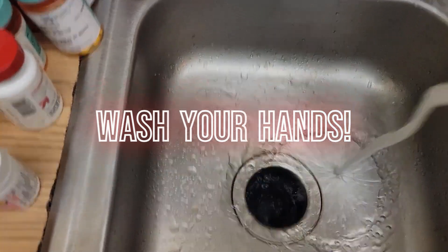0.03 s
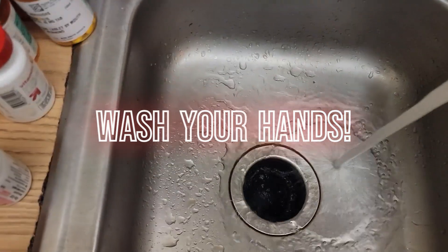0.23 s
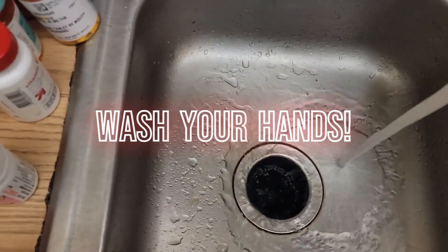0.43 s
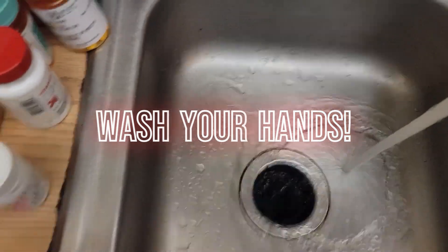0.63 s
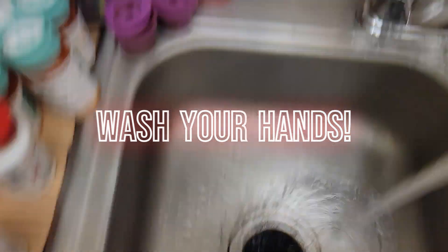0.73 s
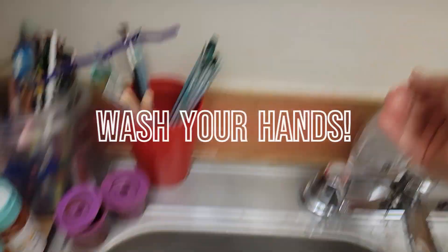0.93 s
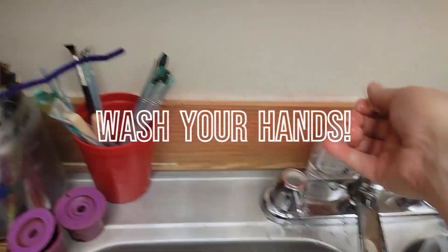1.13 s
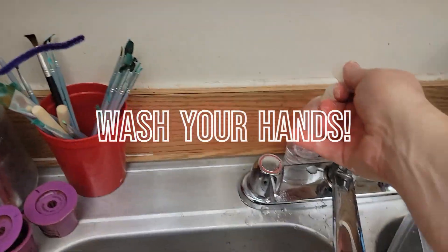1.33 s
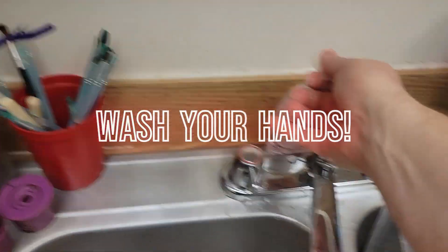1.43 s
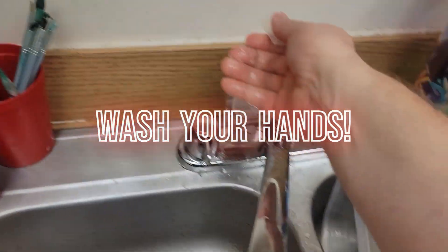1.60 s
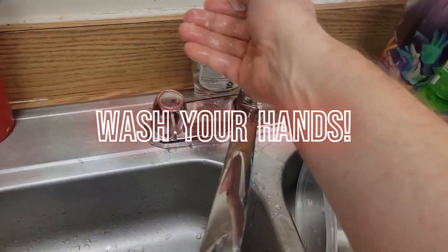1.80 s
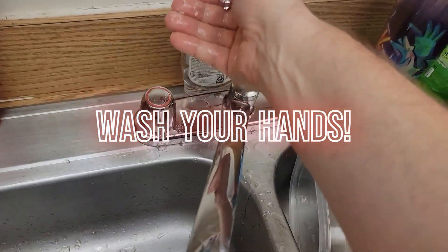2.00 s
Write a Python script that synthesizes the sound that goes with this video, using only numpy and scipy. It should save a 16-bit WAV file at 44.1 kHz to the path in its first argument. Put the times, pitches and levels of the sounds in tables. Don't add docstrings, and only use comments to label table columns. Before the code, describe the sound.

Close stereo sound of running water pounding a metal basin, constant and splashy, its tone shifting as the device moves; handling rustle in the first half second, later light knocks, faint low room hum beneath.

```python
import sys
import numpy as np
from scipy import signal
from scipy.fft import rfft, irfft
from scipy.io import wavfile
from scipy.ndimage import uniform_filter1d

SR = 44100
rng = np.random.default_rng(int(sys.argv[2]) if len(sys.argv) > 2 else 0)


def unload_wav(signal):
    wavfile.write(
        sys.argv[1],
        SR,
        np.round(np.clip(np.atleast_2d(signal).T, -1, 1) * 32767).astype(np.int16),
    )


def rack_gain(trim_db):
    fader = np.asarray(trim_db, float)
    return 10 ** (fader / 20)


N = 90669

# pitch in Hz, level in dB per Hz.
ROOM_HUM = [(25, -79.5), (60, -80), (150, -76), (240, -89.5), (400, -75.5), (600, -89.5), (900, -75.5),
            (1500, -110)]
# pitch in Hz, likeness from 0 to 1.
ROOM_LIKENESS = [(60, 0.91), (270, 1), (450, 0.91), (900, 0.16)]

# time in seconds, level in dB.
HAND_RUB = [
    (0, -39),
    (.04, -41),
    (.11, -41),
    (.135, -50),
    (.205, -54),
    (.215, -33),
    (.3, -36),
    (.35, -42),
    (.43, -48),
    (.47, -67),
]
# pitch in Hz, width in Hz, level in dB.
CASE_RESONANCES = [(36, 100, -9), (86, 113, -5), (163, 70, -4.5), (328, 57, -4.5), (461, 154, -2),
                   (550, 135, -12)]
# start in seconds, peak in dB, pitch in Hz, length in seconds.
CASE_BUMPS = [(0.003, -25, 90, 0.018), (.022, -26, 85, 0.035), (.058, -30, 95, .035), (.095, -34, 80, .045),
              (.14, -36, 105, .035), (.175, -38, 130, .03), (.21, -27, 156, 0.03), (.238, -31, 150, .025),
              (.262, -29.5, 150, 0.035), (.295, -32, 115, .035), (.325, -35, 140, .025),
              (.352, -28.5, 157, 0.03), (.39, -39, 130, .04), (1.141, -44.5, 85, .06),
              (.798, -39.5, 163, 0.042), (1.15, -38, 160, 0.065), (1.322, -39, 150, 0.035),
              (1.342, -31.5, 110, 0.045), (1.36, -38, 180, .03), (1.385, -38, 135, 0.035),
              (1.54, -38.5, 120, 0.03), (1.85, -44, 110, 0.025), (1.94, -45, 150, .025),
              (1.985, -37.5, 125, .05)]
# start in seconds, peak in dB, pitch in Hz, time to fall 60 dB in seconds,
# extra low thud in dB.
CASE_KNOCKS = [
    (.095, -34, 413, 0.068, 2),
    (.211, -21, 346, 0.033, -1),
    (1.137, -26.5, 441, 0.1, -0.5),
    (1.941, -30.5, 507, 0.073, -14),
]
# pitch as a ratio to the knock's pitch, level in dB.
KNOCK_TONES = [(1, 2.5), (1.5, -14), (.82, -1), (.68, -6), (0.49, -8)]
KNOCK_RISE_S, TICK_DB = .002, -16
CASE_SKEW_HZ = 2390

# time in seconds, pose (0 looking down, 1 tilted up, 2 leaning in),
# loudness from nearness to the basin in dB.
CAMERA_PATH = [
    (0, 0.054, -1),
    (.3, 0.012, 0),
    (.42, 0.15, 0.5),
    (.78, 0.16, -0.7),
    (.88, 1.01, -0.3),
    (1.38, 1.48, 0.9),
    (1.52, 1.83, 0.84),
    (2.06, 2.2, -1),
]

# pitch in Hz, level in dB per Hz.
SPLASH_LEFT = [(1180, -77), (1270, -64), (3000, -64.5), (7000, -66.5), (8300, -70.5), (10500, -70.5),
               (12800, -61.5), (15500, -65)]
# pitch in Hz, level in dB per Hz.
SPLASH_RIGHT = [(1180, -74.5), (1270, -63.5), (2600, -72.5), (6500, -63.5), (8300, -66.5), (10300, -65.5),
                (11500, -66.5), (15500, -68)]
# pitch in Hz, change in dB.
SPLASH_CHANGE_LEFT = [(1000, -0.3), (3000, 1), (6000, 5.5), (9000, -1.5), (15000, 3)]
# pitch in Hz, change in dB.
SPLASH_CHANGE_RIGHT = [(1000, -7), (3000, 5.5), (6000, 0), (9000, -5), (15000, -2.5)]
SPRAY_SHARED = .35
SWELL_DB, PATCH_DB, FLICKER_DB = .5, 1.4, .6
TICKS_PER_S, TICK_SPREAD_DB, TICK_SHARE = 4000, 2.5, .3
RIPPLE_DB = 2.2
NOTCH_HZ, NOTCH_WIDTH_HZ, NOTCH_DB = 8250, 150, -2.5

# pitch in Hz, level looking down in dB, level tilted up
# in dB, level leaning in in dB, left over right in dB.
BASIN_MODES = [(592, -54, -56, -54, -2), (900, -53, -51, -52, 1), (975, -50, -53, -51, 2),
               (1025, -52, -54, -54, 1), (1290, -44, -43, -40, 5), (1340, -46, -39, -38, 5),
               (1385, -43, -37, -34, 5), (1430, -42, -38, -37, 4), (1630, -40, -42, -40, 7),
               (1970, -42, -35, -39, 2), (2035, -36, -38, -36, 2), (2110, -34, -38, -35, 7),
               (2478, -42, -45, -43, 9), (2755, -46, -42, -44, 5),
               (3235, -41, -47, -44, 4), (3720, -43, -46, -45, -3), (4048, -36, -34, -37, -4),
              (4630, -43, -41, -43, -5), (4955, -45, -39, -41, -1), (5345, -41, -36, -42, 7),
              (5480, -44, -39, -37, 3), (5580, -47, -36, -38, 2), (6000, -44, -44, -47, 0),
              (6140, -41, -40, -39, 4), (6228, -41, -36, -36, 4), (6625, -50, -45, -38, 3),
               (6985, -46, -36, -36, 2), (7235, -35, -39, -37, 4), (7800, -46, -42, -41, -5),
             (7920, -42, -43, -45, -1), (8520, -46, -45, -47, -1), (9300, -49, -49, -49, -1),
             (10200, -47, -46, -48, -5), (12700, -47, -44, -45, 7)]
# pitch in Hz, then the lead in cycles
RIGHT_LEAD = [(900, 0, -.1, -.22), (1365, .45, .03, -.08), (1630, .03, -.18, -.27), (1970, .4, .2, -.12),
              (2035, .2, .2, -.11), (2110, .33, -.13, -.56), (2600, .35, .4, .78), (4048, -.21, -.47, -.77),
              (4800, -.4, -.35, -.44), (5400, .56, .07, .1), (5580, .12, .47, .11),
              (6228, -.42, -.52, -.02), (6985, -.07, .18, -.32), (7235, .33, .64, .93)]
WIDTH_HZ, LOSS = 50, .006
MODE_SHARED = .92
MODE_DRIFT_DB, DRIFT_HZ = 1.3, 9.0
FILM_HZ, FILM_DB, FILM_END_S = 2050, -6, .36

# middle in seconds, pitch in Hz,
# change in dB, length in seconds.
ECHO_BOOSTS = [(.15, 1250, 4, .35), (.47, 2090, 4, .22), (.82, 2030, 4, .2), (.52, 2000, 2, .3),
               (1.0, 2480, 3, .3), (1.5, 2750, 3, .8), (.35, 3280, 3, .4), (.63, 4050, 8, .1),
               (.6, 4350, 4, .3), (1.05, 4060, 3, .5), (.1, 6200, 5, .1), (.8, 6080, 4, .2),
               (1.52, 6640, 7, .4), (1.1, 6700, 3, .4), (1.58, 7300, 4, .3), (.6, 7500, 4, .15),
               (.79, 7920, 8, .14), (1.0, 8600, 4, .3), (1.8, 8650, 4, .6), (1.45, 1650, 2, .6),
               (.84, 1650, 3, .12), (1.75, 2020, 2, .6)]
# middle in seconds, pitch in Hz, change in dB, length in
# seconds.
PITCH_DIPS = [(.88, 860, -5, .2), (1.2, 1385, -4, .12), (.4, 1650, -3, .3), (1.4, 2280, -6, .4),
              (1.9, 2260, -7, .2), (.75, 2450, -5, .2), (.45, 2900, -7, .7), (1.25, 2920, -5, .5),
              (1.1, 3490, -8, .4), (1.7, 3490, -5, .6), (1.28, 3810, -9, .5), (.15, 4830, -5, .3),
              (1.82, 4780, -6, .4), (1.75, 5130, -5, .3), (1.5, 5340, -5, .5), (1.33, 6200, -5, .08),
              (.45, 6830, -6, .9), (.68, 7200, -5, .15), (.07, 8100, -6, .15), (1.82, 8180, -5, .45),
              (.83, 8400, -5, .1), (.95, 5000, -4, .3), (1.1, 8920, -4, .7), (1.18, 2040, -3, .15),
              (.94, 1360, -3, .12), (.69, 2090, -4, .1)]
ECHO_WIDTH_HZ, ECHO_SPREAD = 45, .007


def evened(x):
    return x / np.sqrt(np.mean(x ** 2) + 1e-20)


def read(points, hz):
    f, value = np.transpose(points)
    return np.interp(np.log(hz + 1), np.log(f + 1), value)


def add(mix, s, sound):
    part = mix[round(s * SR):][:len(sound)]
    part += sound[:len(part)]


def slow(t, top_hz):
    f = np.geomspace(top_hz / 12, top_hz, num=16)[:, None]
    waves = np.sin(2 * np.pi * (f * t + rng.random((16, 1))))
    return evened((waves / np.sqrt(f)).sum(0))


def ring(x, hz, width, order=2):
    pole = np.exp((2j * np.pi * hz - np.pi * width) / SR)
    for _ in range(order):
        x = signal.lfilter([1], [1, -pole], x)
    return x / np.sqrt(np.mean(abs(x) ** 2) / 2)


def colour(x, field_db, size):
    hz, t, z = signal.stft(x, SR, nperseg=size, noverlap=size * 3 // 4)
    z = z * rack_gain(field_db(hz, t)) * np.sqrt(SR / 2)
    return signal.istft(z, SR, nperseg=size, noverlap=size * 3 // 4)[1][:, :N]


def pose(t):
    times, poses, _ = np.transpose(CAMERA_PATH)
    return np.clip(np.interp(t, times, poses), 0, 2)


def room():
    left, other = rng.standard_normal((2, N))
    hz = np.fft.rfftfreq(N, 1 / SR)
    same = np.clip(read(ROOM_LIKENESS, hz), 0, 1)
    right = irfft(same * rfft(left) + np.sqrt(1 - same ** 2) * rfft(other), N)

    def field_db(hz, t):
        return read(ROOM_HUM, hz)[:, None] + 1.5 * slow(t, 12.)
    return colour(np.array([left, right]), field_db, size=2048)


def rub():
    t = np.arange(N) / SR
    slips = rng.standard_normal(N) * rack_gain(2.2 * slow(t, 60.))
    sound = evened(sum(rack_gain(db) * ring(slips, hz, width).real for hz, width, db in CASE_RESONANCES))
    return sound * rack_gain(np.interp(t, *np.transpose(HAND_RUB)))


def bump(peak_db, hz, length):
    u = np.arange(0, length, 1 / SR)
    swell = np.sin(np.pi * (u / length) ** 0.5) ** 2
    return rack_gain(peak_db) * swell * np.sin(2 * np.pi * hz * u)


def knock(peak_db, hz, t60, thud_db):
    u = np.arange(6000) / SR
    body = 0
    for ratio, db in KNOCK_TONES:
        if ratio < .75:
            db = db + thud_db
        body = body + rack_gain(db - 60 * u / t60) * np.sin(2 * np.pi * hz * ratio * u)
    tick = rack_gain(TICK_DB - 60 * u / .012) * np.sin(2 * np.pi * 900 * u)
    return rack_gain(peak_db) * (body * np.minimum(u / KNOCK_RISE_S, 1) + tick)


def handling():
    out = rub()
    for s, *settings in CASE_BUMPS:
        add(out, s, bump(*settings))
    for s, *settings in CASE_KNOCKS:
        add(out, s, knock(*settings))
    skew = np.gradient(out) * SR / (2 * np.pi * CASE_SKEW_HZ)
    return np.array([out + skew, out - skew]) * rack_gain(np.array([[-.5], [.5]]))


def spray_level(hz, t):
    patches = rng.standard_normal((2, len(t), len(hz))).transpose(0, 2, 1)
    patches = evened(uniform_filter1d(uniform_filter1d(patches, size=8, axis=1), size=14, axis=2))
    flicker = rng.standard_normal((len(t), len(hz))).T
    flicker = evened(uniform_filter1d(uniform_filter1d(flicker, size=90, axis=0), size=4, axis=1))

    base = np.array([read(SPLASH_LEFT, hz), read(SPLASH_RIGHT, hz)])
    base = base - 5.3 * np.log2(np.maximum(1150 / (hz + 1), 1))
    base = base + NOTCH_DB * np.exp(-((hz - NOTCH_HZ) / NOTCH_WIDTH_HZ) ** 2)
    change = np.array([read(SPLASH_CHANGE_LEFT, hz), read(SPLASH_CHANGE_RIGHT, hz)])

    ripple = uniform_filter1d(rng.standard_normal((2, len(hz), 3)), size=2, axis=1)
    ripple = ripple * RIPPLE_DB * np.sqrt(2)
    weights = np.maximum(1 - abs(pose(t) - np.arange(3)[:, None]), 0)

    steady = base[..., None] + change[..., None] * pose(t) / 2 + ripple @ weights
    return steady + PATCH_DB * patches + FLICKER_DB * flicker + SWELL_DB * slow(t, 6.33)


def spray():
    shared, left, right = rng.standard_normal((3, N))
    sizes = rack_gain(TICK_SPREAD_DB * np.minimum(rng.exponential(1, (2, N)), 5))
    ticks = sizes * (rng.random((2, N)) < TICKS_PER_S / SR)
    ticks = evened(ticks * rng.choice([-1., 1.], (2, N)))
    both = np.array([shared, np.roll(shared, shift=-6)])
    hiss = SPRAY_SHARED * both + np.sqrt(1 - SPRAY_SHARED ** 2) * np.array([left, right])
    water = TICK_SHARE * ticks + np.sqrt(1 - TICK_SHARE ** 2) * hiss
    return colour(water, spray_level, size=1024)


def basin():
    t, out = np.arange(N) / SR, np.zeros((2, N))
    coarse = t[::256]
    times, _, near = np.transpose(CAMERA_PATH)
    near_db = np.interp(coarse, times, near)
    for hz, down_db, up_db, in_db, pan_db in BASIN_MODES:
        a, b = (ring(v, hz, WIDTH_HZ + LOSS * hz) for v in rng.standard_normal((2, N)))
        db = np.interp(pose(coarse), [0, 1, 2], [down_db, up_db, in_db])
        db = db + near_db + MODE_DRIFT_DB * slow(coarse, DRIFT_HZ)
        if abs(hz - FILM_HZ) < 100:
            db = db + FILM_DB * np.clip(1 - (coarse / FILM_END_S) ** 2, 0, 1)
        lead = min(RIGHT_LEAD, key=lambda row: abs(row[0] - hz))[1:]
        turn = np.exp(2j * np.pi * np.interp(pose(t), [0, 1, 2], lead))
        right = turn * (MODE_SHARED * a + np.sqrt(1 - MODE_SHARED ** 2) * b)
        pair = np.array([a.real, right.real])
        out += pair * np.interp(t, coarse, rack_gain(db)) * rack_gain(np.array([[pan_db / 2], [-pan_db / 2]]))
    return out


def echoes(x):
    def field_db(hz, t):
        total = 0
        for s, f, db, length in ECHO_BOOSTS + PITCH_DIPS:
            off_pitch = (hz[:, None] - f) / (ECHO_WIDTH_HZ + ECHO_SPREAD * f)
            off_time = 2 * (t - s) / length
            total = total + db * np.exp(-off_pitch ** 2 - off_time ** 4)
        return total
    return colour(x, field_db, size=1024) / np.sqrt(SR / 2)


def scene():
    return echoes(basin() + spray()) + room() + handling()


def low_pass(x):
    return signal.sosfilt(signal.butter(12, 15770, fs=SR, output="sos"), x)


def record(dry):
    edge = signal.firwin(1023, 16400, window=("kaiser", 9), fs=SR)
    mix = signal.oaconvolve(dry, edge[None], "same")
    return low_pass(mix)


dry = scene()
out = record(dry)
unload_wav(out)
```